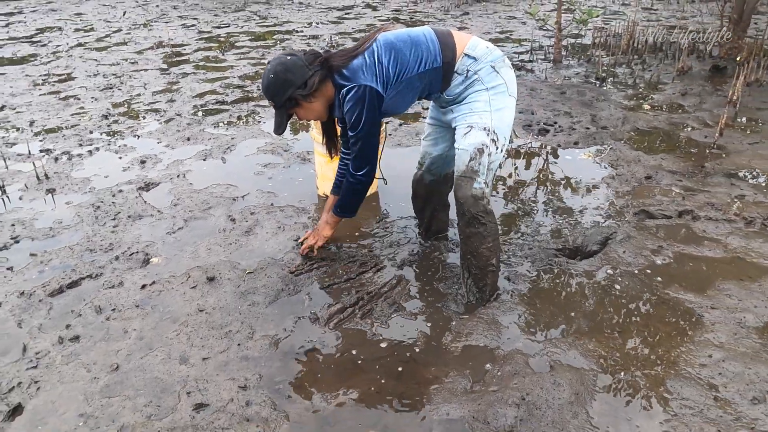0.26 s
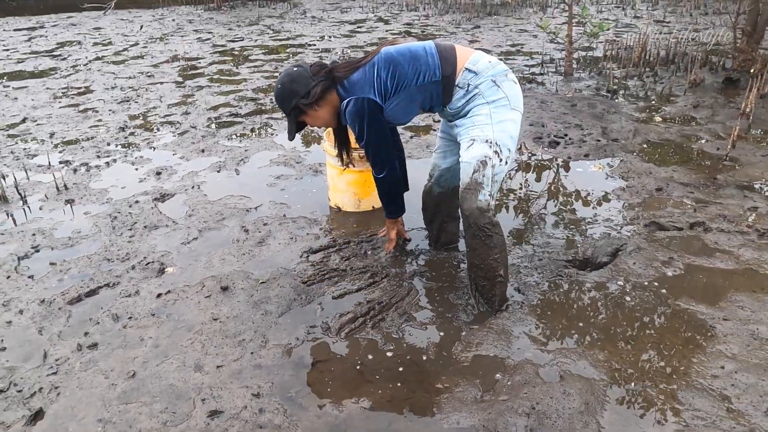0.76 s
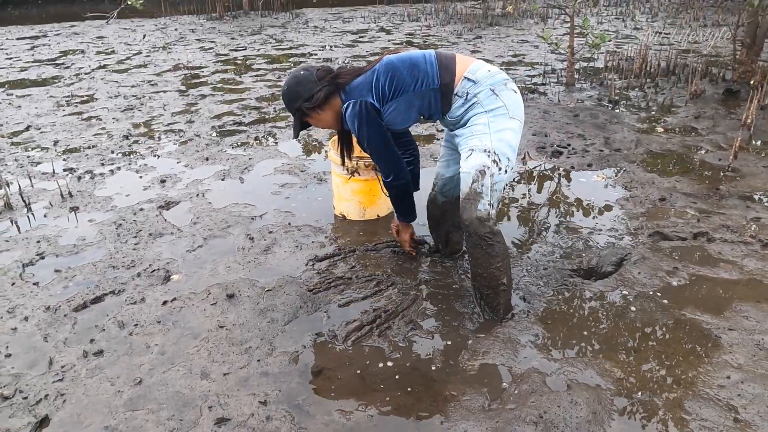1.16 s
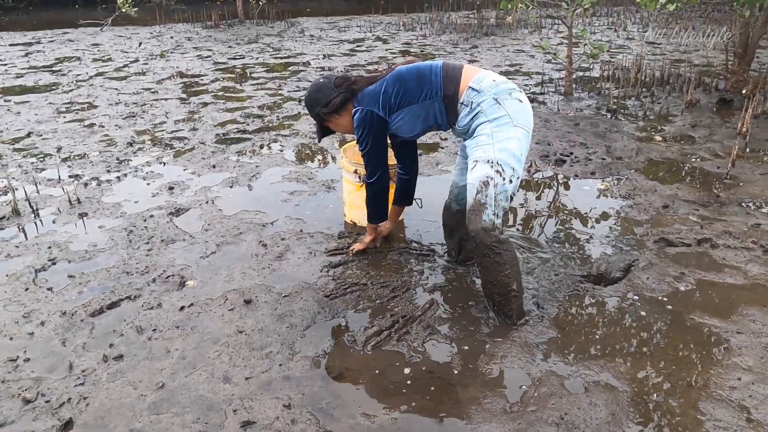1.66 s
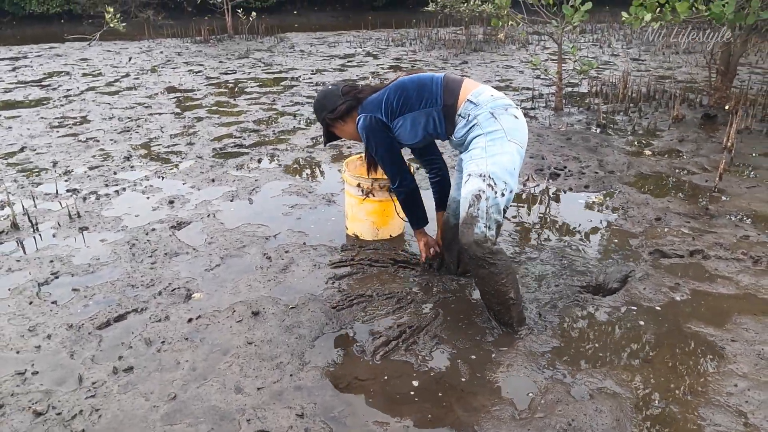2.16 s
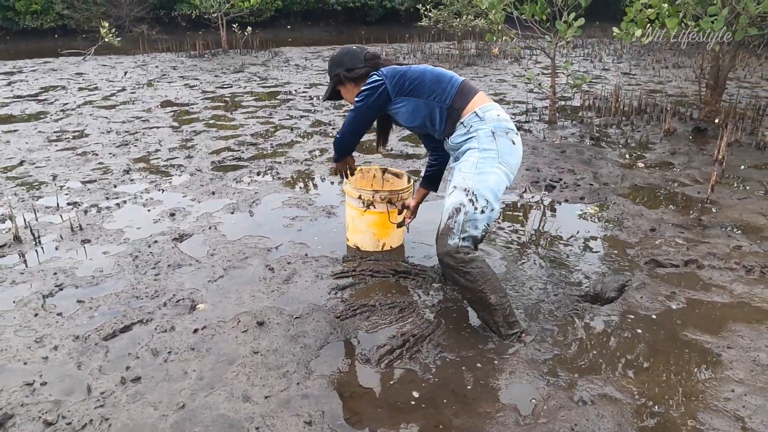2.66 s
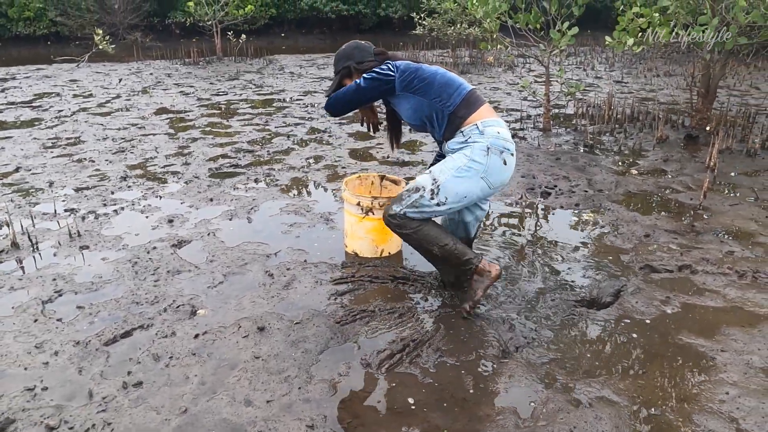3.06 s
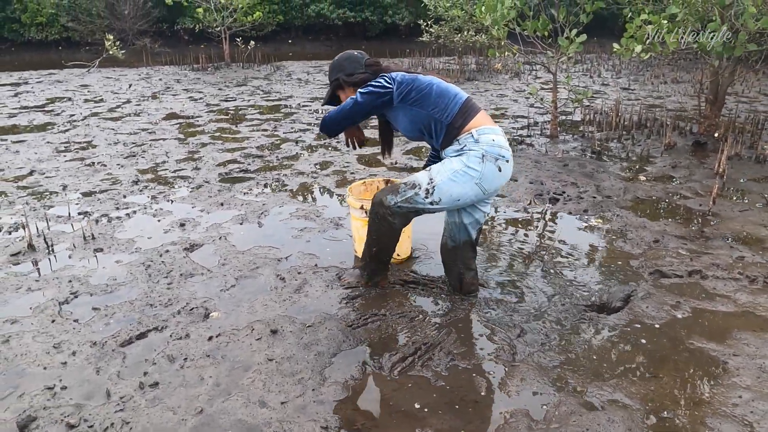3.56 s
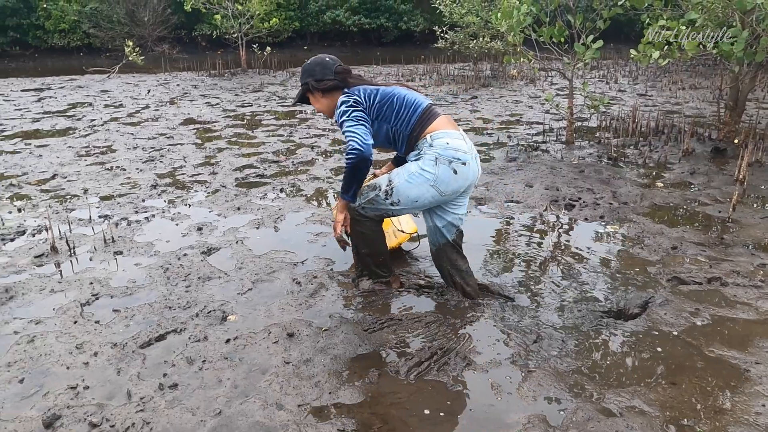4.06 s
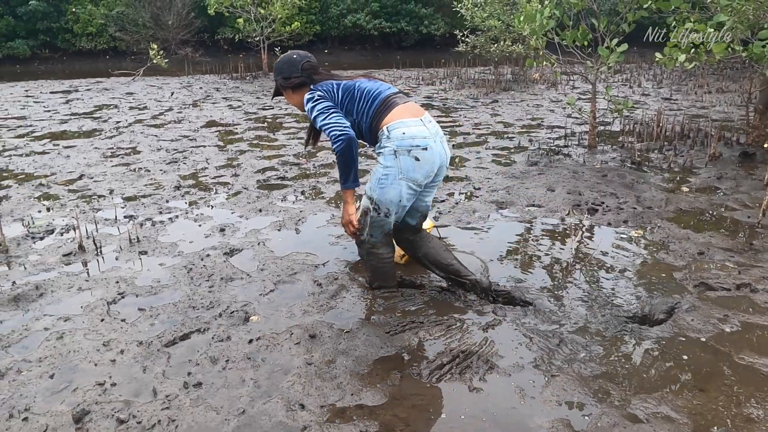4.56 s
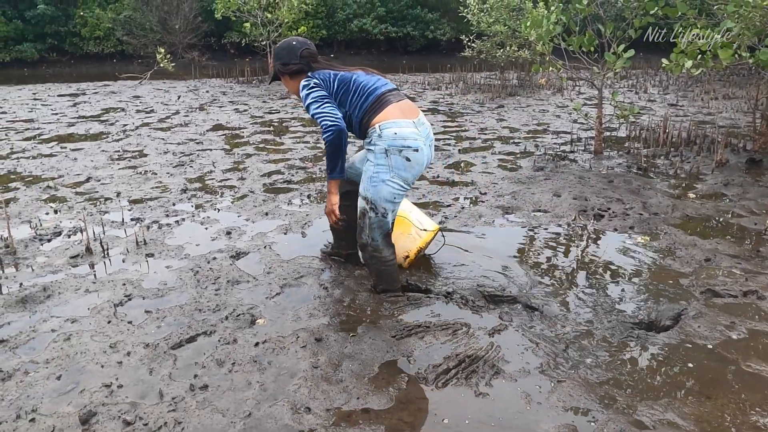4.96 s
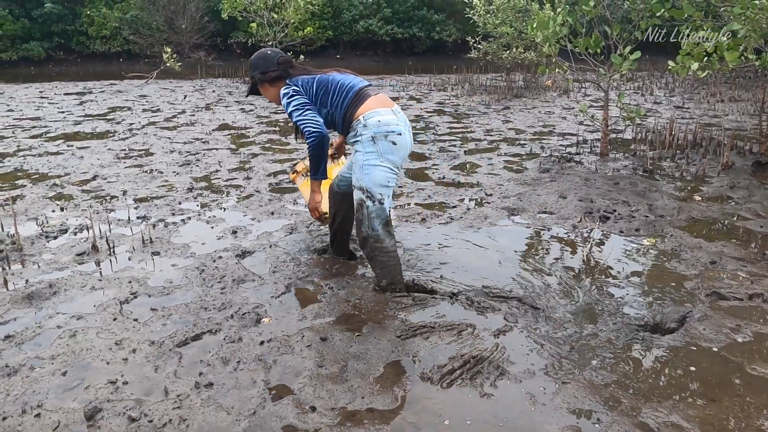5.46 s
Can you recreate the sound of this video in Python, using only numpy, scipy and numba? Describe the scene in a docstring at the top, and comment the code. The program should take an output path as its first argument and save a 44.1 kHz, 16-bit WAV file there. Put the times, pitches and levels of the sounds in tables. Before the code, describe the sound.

Close by, hands rummage in wet mud and shallow water, making small plops, drips and fizzing splashes. About halfway through, feet start wading with fuller squelches and gurgles. A plastic bucket is dragged briefly over the mud with a hollow rub and boom, and more splashing steps follow. A distant low drone lies under everything on the open tidal flat, with light wind rumbling on the microphone.

```python
"""Wading on a tidal flat

Hands rummage in wet mud and legs wade through a thin sheet of water. Air pockets plop, drops and
mud films snap, stirred water fizzes, and air squirts from under a foot. A plastic bucket is dragged
once over the mud, rubbing and booming. Below lie a far drone and light wind on two microphone ports."""
import sys
import numpy as np
from scipy import signal
from scipy.fft import rfft, irfft, next_fast_len
from scipy.io import wavfile
from numba import njit

SR = 44100
rng = np.random.default_rng(int(sys.argv[2]) if len(sys.argv) > 2 else 0)


def file_out(sig):
    """Save sig as 16-bit WAV at sys.argv[1]."""
    # one column per channel
    cols = np.atleast_2d(sig).T
    # limit, then scale
    lim = np.clip(cols, -1, 1)
    pcm = np.round(lim * 32767).astype(np.int16)
    wavfile.write(sys.argv[1], SR, pcm)


N = 251966

# air pockets bursting: t/s, level/dB, f/Hz, fade/ms
AIR_POCKETS = [(0.043, -31.5, 1330, 0.066), (0.0495, -42.5, 544, 11.3), (0.11, -51, 2010, 2.8),
               (0.27, -47.5, 1660, 6.4), (0.319, -42, 1710, 3), (0.391, -41, 294, 17.5),
               (0.4358, -38.5, 1023, 9.1), (0.4385, -37.5, 1700, 0.52), (1.002, -54, 480, 5.8),
               (0.58, -51, 1600, 3.5), (0.637, -49.5, 1920, 5.4), (0.6886, -38, 3330, 1.4),
               (0.7, -42, 2350, 2.7), (0.7478, -36.5, 1233, 7.5), (0.77, -27, 1770, 6.3),
               (0.8288, -45, 1425, 8), (0.839, -43, 3800, 3.8), (0.8649, -42.5, 1580, 2.1),
               (0.886, -45.5, 1790, 8.7), (0.894, -39, 2420, 1), (0.9854, -37, 1700, 0.44),
               (0.9901, -42, 990, 3.2), (1.069, -39, 3960, 3), (1.081, -37, 2420, 0.66),
               (1.0996, -41.5, 2040, 0.57), (0.841, -48, 1340, 4), (0.91, -49, 1350, 2.6),
               (0.928, -48, 1910, 4), (1.03, -50, 990, 4.5), (1.076, -46, 1110, 4), (1.281, -41, 3170, 0.5),
               (1.2898, -38.5, 2670, 0.92), (1.2977, -41, 2460, 7.6), (1.299, -40, 1720, 6),
               (1.3338, -37, 2040, 0.33), (1.431, -39.5, 1500, 0.86), (1.445, -35.5, 2810, 1.7),
               (1.7165, -48, 1660, 3), (1.725, -37.5, 1880, 0.16), (1.727, -47.5, 1060, 4.3),
               (1.995, -44.5, 1860, 2), (2.031, -46.5, 2550, 0.33), (2.076, -53.5, 2290, 0.8),
               (2.205, -57, 3500, 6.1), (2.373, -48, 1150, 0.31), (2.18, -38.5, 3810, 4.2),
               (2.3763, -33, 2710, 2.6), (2.3773, -49.5, 593, 9), (2.563, -46.5, 1530, 11.6),
               (2.6471, -45, 1730, 2.5), (2.7795, -46.5, 976, 7.6), (2.797, -37.5, 2030, 0.3),
               (2.816, -46, 1600, 2.9), (2.8992, -46.5, 1940, 9), (3.008, -35.5, 1690, 0.81),
               (3.0809, -25.5, 770, 4.5), (3.107, -36, 940, 3.3), (3.117, -37, 714, 3.7),
               (3.126, -35, 1100, 0.83), (3.1489, -35, 2200, 0.6), (3.1694, -51, 649, 45),
               (3.172, -38, 2520, 4.7), (3.151, -42, 1280, 2.7), (3.268, -45, 2360, 3.4),
               (3.327, -44, 1820, 2.2), (3.2357, -31.5, 3030, 0.43), (3.61, -43, 1010, 0.5),
               (3.513, -39.5, 1530, 0.36), (3.538, -39, 1780, 2.9), (3.548, -37, 1920, 1.1),
               (3.556, -31, 2010, 1.6), (3.5658, -30.5, 1850, 2.8), (3.582, -23, 2080, 0.15),
               (3.626, -43, 1070, 5.8), (3.6595, -40.5, 1126, 4.9), (3.689, -41.5, 1650, 2.8),
               (3.718, -46.5, 1870, 11), (3.962, -52, 1200, 5), (4.007, -36.5, 840, 1.4),
               (4.0065, -33.5, 2010, 1.5), (4.021, -37.5, 2070, 0.3), (4.322, -42.5, 387, 5.7),
               (4.3234, -37, 960, 0.74), (4.483, -44, 2800, 0.68), (4.7177, -44, 892, 14),
               (4.769, -29, 3300, 1.3), (4.7735, -36, 2920, 4.3), (4.776, -30, 906, 13),
               (4.784, -46, 477, 2.8), (4.7964, -23, 2050, 1.1), (4.8022, -32, 687, 8.5),
               (4.8203, -42, 3400, 2.2), (4.842, -40, 2710, 7.3), (4.851, -39.5, 940, 8.9),
               (4.872, -33, 910, 5.8), (4.9193, -48, 805, 4.9), (5.003, -46.5, 1110, 7.5),
               (5.1216, -34.5, 3310, 1.7), (5.163, -35, 1800, 0.51), (5.172, -32.5, 2520, 1.2),
               (5.18, -34.5, 2520, 0.73), (5.215, -32, 2930, 0.6), (5.25, -39.5, 1765, 6.2),
               (5.281, -50, 1020, 13), (5.374, -37, 1770, 4.4), (5.29, -45, 1930, 13),
               (5.3857, -44, 710, 4.6), (5.401, -47.5, 560, 6.4), (5.404, -39.5, 1820, 2.1),
               (5.476, -49.5, 1040, 15), (5.501, -42, 1560, 2.9), (5.174, -52, 670, 4.1),
               (5.308, -49, 1025, 8), (5.409, -45, 1110, 3.7), (5.17, -37.5, 1690, 4.3)]
SWELL_CYCLES, PLOP_CLIMB = 2.26, 0.015   # attack; share the pitch climbs over swell plus fade
# bubbles surfacing with an upward chirp: t/s, level/dB, f/Hz, fade/ms, climb/(share per s)
SURFACING_BUBBLES = [(1.172, -33, 1155, 5.6, 11), (2.129, -52, 1050, 9, 5.6), (3.042, -40, 1065, 5.6, 35),
                     (3.085, -41, 2050, 8.6, 36), (3.1989, -44.5, 728, 17, 9.1),
                     (4.0012, -31.5, 1205, 3.5, 114), (4.7136, -30.5, 1730, 4, 40),
                     (4.934, -44, 1620, 4.4, 130), (5.541, -49.5, 906, 10, 14)]
# drops and mud films snapping: t/s, level/dB, f/Hz
FILM_SNAPS = [(0.0377, -38.5, 7000), (0.044, -43, 6600), (0.055, -46, 7050), (0.096, -53, 7100),
              (0.14, -38.5, 5000), (0.176, -52, 5300), (0.206, -49.5, 7400), (0.27, -45.5, 3200),
              (0.383, -43, 6550), (0.384, -42, 4000), (0.395, -51, 7800), (0.4477, -42.5, 5230.0),
              (0.473, -45, 4830), (0.491, -41, 6400), (0.508, -44, 4900), (0.6069, -44, 3620),
              (0.751, -48, 8000), (0.7684, -37.5, 3970), (0.803, -37.5, 4020), (0.8517, -40.5, 3660),
              (0.8931, -43, 4070.0), (0.9074, -37, 4800), (0.941, -46.5, 7440), (1.026, -39, 5240),
              (1.045, -41, 4070), (1.0938, -37.5, 7500), (1.096, -42, 3700), (1.102, -43, 6970),
              (1.102, -40, 4200), (1.274, -46, 5700), (1.29, -38.5, 5740), (1.2987, -32, 5100),
              (1.4166, -55, 9200), (1.4289, -34, 4270), (1.44, -41, 5300), (1.4627, -51, 4220.0),
              (1.512, -44.5, 5400), (1.6104, -51.5, 6300), (1.651, -45, 4320), (1.6822, -46.5, 4330),
              (1.727, -38, 4850), (1.7353, -44, 2900), (1.8622, -51, 9100), (1.9468, -47.5, 5360),
              (1.9743, -52, 5800), (2.0445, -51.5, 7450), (2.2892, -50, 2850), (2.289, -39.5, 7100),
              (2.34, -52.5, 6860), (2.414, -37.5, 7000), (2.474, -55, 8200), (2.8154, -51, 3060),
              (3.003, -46, 3380), (3.0942, -47, 9000), (3.1394, -36, 3740), (3.168, -32, 3800),
              (3.3176, -46, 4420), (3.425, -34, 4770), (3.51, -49, 4220), (3.5556, -41, 4700),
              (3.595, -30, 4600), (3.617, -48.5, 8140), (4.008, -44.5, 6500), (4.005, -48, 2790),
              (4.55, -58, 9300), (4.712, -38, 4740), (4.757, -36, 3290.0), (4.761, -38, 7000),
              (4.799, -26.5, 3380), (4.845, -37, 3780), (4.9965, -41, 4570), (5.006, -58, 7560),
              (5.1013, -35, 4400), (5.106, -46, 7100), (5.1146, -37, 4200), (5.122, -33.5, 4500),
              (5.169, -34, 5240), (5.223, -33, 4100), (5.499, -41, 4900), (0.0394, -43, 2740),
              (0.435, -43.5, 3100), (0.731, -48, 4530), (1.224, -54, 2580), (1.5753, -54.5, 5800),
              (1.884, -52, 7300), (2.054, -52, 2340), (2.103, -54, 2600), (2.259, -59, 4560),
              (3.699, -55, 2870), (3.865, -54, 4500), (4.022, -41.5, 4730), (4.351, -46, 2760),
              (4.3993, -51, 4880), (4.462, -51, 4000), (4.59, -56.5, 4050), (4.6572, -51, 2700),
              (4.928, -45.5, 2860), (4.954, -53.5, 7150), (5.0537, -45.5, 2770), (5.088, -47, 4220),
              (5.3893, -48, 3640), (5.571, -53, 6250), (0.826, -39, 5800), (0.861, -43, 5200),
              (0.931, -53, 7500), (0.954, -51, 8300), (0.985, -47, 5030), (0.556, -51, 2960),
              (1.89, -55, 2740), (1.905, -58, 7050), (2.229, -57, 4550), (5.289, -53, 7700),
              (2.377, -51, 7500), (1.39, -52, 8000)]

# strokes of hand or leg: t/s, hold/s, bubbling level/dB, then over it slurp/dB, gurgle/dB, fizz/dB
WATER_STROKES = [(0.0, 0.072, -67.5, 6, -6, 1), (0.154, 0.24, -73, 4, -18, 3.5),
                 (0.383, 0.051, -63, 4.5, -17, 2.5), (0.466, 0.22, -72, -16, -2.5, 5.5),
                 (0.748, 0.17, -61, -21, -29, 1), (0.897, 0.26, -62.5, -5.5, -16, -2.5),
                 (1.253, 0.11, -61, -13, -23, 0), (1.435, 0.027, -68.5, -16, -26, -1),
                 (1.654, 0.058, -66.5, -15, -16, -1.5), (1.962, 0.063, -78.5, -4, 0, 2),
                 (2.281, 0.061, -72.5, -18, -19, 0.5), (2.604, 0.065, -74.5, 6.5, -7, -13),
                 (2.702, 0.098, -60.5, -6, -23, -11), (2.886, 0.025, -58, -3, -3.5, -3.5),
                 (2.99, 0.17, -63, -21, -3, -1.5), (3.087, 0.16, -58.5, -8, -0.5, -3),
                 (3.28, 0.17, -66.5, -33, -3.5, -1), (3.523, 0.093, -56.5, -9.5, -8, -5),
                 (3.653, 0.1, -64, -2, -14, -9), (4.06, 0.26, -62, 2.5, 2.5, -6),
                 (4.352, 0.14, -74, -2.5, -6, 3.5), (4.712, 0.036, -52.5, -32, -19, -7.5),
                 (4.765, 0.041, -48.5, -25, -1.5, 0), (4.85, 0.079, -61, -27, -7, -1.5),
                 (4.973, 0.032, -61.5, -30, -27, 5), (5.079, 0.071, -64.5, -29, -19, 9.5),
                 (5.158, 0.056, -58, -34, -30, 0), (5.234, 0.12, -56.5, -38, -21, -4),
                 (5.386, 0.12, -60.5, -17, -11, -1), (5.557, 0.12, -77.5, 4.5, -8, 7)]
ATTACK_DB_PER_S, RELEASE_DB_PER_S = 897, 197
SPRAY_DB, SPRAY_FOLLOWS = -6.5, 1.66   # spray over the bubbling; dB it gains per dB of fizz offset
# water between strokes: level/dB of slurp, gurgle, bubbling, fizz and spray
CALM_WATER_DB = [-104, -109, -79.5, -84, -79.5]

# resonances of the air squirt: f/Hz, width/Hz, level/dB
SQUIRT_RESONANCES = [(1780, 670, 2.5), (3400, 1100, 2.5), (5350, 770, 1.5), (7200, 380, -1)]
SQUIRT_START_S, SQUIRT_DB, SQUIRT_FADE_S = 2.8562, -57.5, 0.021

# friction of the bucket on the mud: t/s, level/dB
DRAG_FRICTION = [(4.02, -63.5), (4.06, -63), (4.174, -55.5), (4.34, -65.5), (4.42, -78)]
# resonances of its hollow body: f/Hz, width/Hz, level/dB
BUCKET_MODES = [(235.7, 41, 13), (311, 32, 2), (685, 280, -1), (980, 230, 4.5), (1510, 290, -3),
                (2900, 1700, -7.5), (6500, 1600, -25)]
# its booms as it lurches: t/s, level/dB, f/Hz, swell and fade/ms
BUCKET_LURCHES = [(4.0931, -31, 236, 12), (4.1357, -32.5, 230, 9.3), (4.1862, -21.5, 239, 11.3),
                  (4.2661, -41, 270, 11), (4.306, -36, 265, 5.4), (4.337, -31.5, 218, 7.8)]

# gusts on the ports: t/s, level/dB
GUSTS = [(0, -55.5), (0.35, -40.5), (0.6, -60), (1.4, -45), (2.1, -50), (2.6, -48), (2.9, -38.5),
         (3.22, -39.5), (3.31, -26), (3.42, -33), (3.5, -36), (3.62, -31), (3.8, -49), (4.05, -49.5),
         (4.45, -54.5), (5.05, -37), (5.3, -46), (5.71, -48.5)]
# noise bands of the far drone: f/Hz, width/Hz, level/dB
DRONE_BANDS = [(62.5, 8.7, -4.5), (75.4, 15.7, -2.5), (103.5, 14.4, -6), (129.3, 17.3, -10.5),
               (155.1, 16.2, -15.5), (206.5, 25, -22)]
# steadier tones in the drone: f/Hz, wander/Hz, level/dB
HUM_TONES = [(62.33, 1.524, 2), (150, 1.52, -8.5), (235.4, 2.52, -23)]
# far noise of the flat: f/Hz, level/dB
AIR_SPECTRUM = [(59, -36), (100, 1.5), (172, -16.5), (225, -7.5), (277, -16.5), (371, -27.5), (612, -36.5),
                (1660, -35), (2570, -45), (3700, -49), (5800, -45), (8300, -57), (9100, -60), (12000, -68),
                (14500, -84)]
# how alike that noise is left and right: f/Hz, likeness/(0 to 1)
AIR_COHERENCE = [(30, 1), (300, 0.8), (2000, 0.074), (6000, 0.57), (12000, 0.17)]
DRONE_DB, AIR_DB = -41.5, -55.5

# colour of the ports: f/Hz, left minus right level/dB
PORT_TILT = [(60, -1.5), (130, 2.5), (290, -2.7), (630, -0.5), (1370, 1.5), (2990, 2), (6540, 2.5),
             (14300, 0)]
# phase between the ports: f/Hz, lead of the left/rad
PORT_LEAD = [(30, 0.12), (600, -0.4), (1200, -0.037), (2410, -0.64), (4820, -0.58), (5940, -1.38),
             (6720, -0.4), (12100, -0.56), (14500, -1.1)]
CUTOFF_HZ = 14850


def plops():
    """Air pockets ring with a slight climb and a rough tail; surfacing bubbles chirp. Both spatter."""
    s, level_db, hz, fade_ms = np.transpose(AIR_POCKETS)
    swell, fade = SWELL_CYCLES / hz, fade_ms / 1000
    pockets = rings(s, from_db(level_db), hz, swell, fade, PLOP_CLIMB / (swell + fade))
    s, level_db, hz, fade_ms, climb = np.transpose(SURFACING_BUBBLES)
    chirps = rings(s, from_db(level_db), hz, SWELL_CYCLES / hz, fade_ms / 1000, climb)
    tails = spatter(AIR_POCKETS, width_share=0.24, gain_db=-19, fade_s=0.012)
    droplets = spatter(AIR_POCKETS + SURFACING_BUBBLES, width_share=0.78, gain_db=-9.5, fade_s=0.0035)
    return pockets + chirps + tails + droplets


def snaps():
    """Drops and mud films snap: a ring of a few cycles, a bright tick and a short hiss."""
    s, level_db, hz = np.transpose(FILM_SNAPS)
    body = rings(s, from_db(level_db + 2.5), hz, swell_s=1.02 / hz, fade_s=3.2 / hz)
    tick_db = level_db - 26 + rng.normal(0, 7.0, len(s))
    ticks = rings(s, from_db(tick_db), hz=12000, swell_s=0.00008, fade_s=0.00019)
    wide_hiss = spatter(FILM_SNAPS, width_share=0.57, gain_db=-6.5, fade_s=0.0032)
    tight_hiss = spatter(FILM_SNAPS, width_share=0.24, gain_db=-7, fade_s=0.0016)
    return body + ticks + wide_hiss + tight_hiss


def spatter(events, width_share, gain_db, fade_s):
    """Thrown droplets land: a puff of noise around each event's pitch."""
    out, longest = np.zeros(N), 2600
    t = np.arange(min(int(7 * fade_s * SR), longest)) / SR
    envelope = np.exp(-t / fade_s) * (1 - np.exp(-t / 0.001))
    for (s, level_db, hz, *_), noise in zip(events, rng.standard_normal((len(events), longest))):
        hiss = rms_one(resonate(noise[:len(t)], hz, width_share * hz))
        add(out, s - .0007, from_db(level_db + gain_db) * hiss * envelope)
    return out


def stirred_water():
    """Strokes stir five bubble layers, from mud slurp to fine spray, roughened by crackle and wash."""
    tear, wash = crackle(per_s=220, spread_db=2.5), rng.standard_normal(N)
    slurp = bubbles(300, 360, 680, cycles=1.1, spread_db=4.5, clump_db=2.0, climb_per_s=5.4)
    gurgle = bubbles(250, 661, 1028, cycles=3.1, spread_db=5.5, clump_db=4.0, climb_per_s=5.1)
    bubbling = bubbles(1100, 1152, 2660, cycles=2.6, spread_db=6.0, clump_db=4.5, climb_per_s=13.0)
    fizz = bubbles(900, 2385, 5920, cycles=3.6, spread_db=3.0, clump_db=4.0, climb_per_s=40.0)
    spray = bubbles(1500, 4600, 8400, cycles=3.6, spread_db=4.5, clump_db=5.0, climb_per_s=3.7)
    gurgle += 0.33 * rms_one(band(band(tear, 650, 980), 650, 980))
    bubbling += 0.69 * rms_one(band(band(tear, 1050, 2380), 1050, 2380))
    bubbling += 0.38 * rms_one(band(wash, 1380, 2880))
    fizz += 0.31 * rms_one(band(tear, 3300, 4600))
    fizz += 0.22 * rms_one(band(wash, 2500, 5200))
    spray += 0.35 * rms_one(band(band(tear, 6500, 11600), 6500, 13500))
    spray += 0.18 * rms_one(band(wash, 7800, 9000))
    spray += 0.07 * bubbles(100, 10000, 13500, cycles=1.5, spread_db=16.5, clump_db=7.0, climb_per_s=0.)
    layers = np.array([slurp, gurgle, bubbling, fizz, spray])
    return np.sum(stroke_envelopes() * layers, axis=0)


def stroke_envelopes():
    """One gain per water layer: each stroke swells, holds and ebbs; powers add over the calm water."""
    start, hold, db, slurp_db, gurgle_db, fizz_db = np.transpose(WATER_STROKES)
    t = np.arange(0, N + 64, 64)[:, None] / SR
    attack_db = -ATTACK_DB_PER_S * np.maximum(start - t, 0)
    release_db = -RELEASE_DB_PER_S * np.maximum(t - start - hold, 0)
    shape = from_db(attack_db + release_db)
    spray_db = SPRAY_DB + SPRAY_FOLLOWS * fizz_db
    held = from_db([db + slurp_db, db + gurgle_db, db, db + fizz_db, db + spray_db])
    gains = np.sqrt(shape ** 2 @ held.T ** 2 + from_db(CALM_WATER_DB) ** 2)
    return np.array([np.interp(np.arange(N) / SR, t[:, 0], gain) for gain in gains.T])


def bubbles(per_s, low_hz, high_hz, cycles, spread_db, clump_db, climb_per_s):
    """Small bubbles ring in random clumps, uneven in size, pitch and length; rms 1."""
    born = rng.random(N) < per_s * from_db(clump_db * drift(20)) / SR
    pitch, size, length, climb = rng.random((N, 4))[born].T
    hz = low_hz * (high_hz / low_hz) ** pitch
    height = from_db(-spread_db * np.log(np.maximum(size, .03)))
    fade = cycles * (0.071 + 2.83 * length) / hz
    return rms_one(rings(np.flatnonzero(born) / SR, height, hz, 0.13 * fade, fade, climb_per_s * climb))


def crackle(per_s, spread_db):
    """Thin films tear: broadband clicks a few milliseconds long over a steady wet hiss; rms 1."""
    born = rng.random(N) < per_s * from_db(4.0 * drift(12)) / SR
    sizes = from_db(spread_db * np.minimum(rng.exponential(1, N), 3.0))
    decay = np.exp(-1 / (0.0022 * SR))
    envelope = signal.lfilter([1], [1, -decay], born * sizes + 1e-18)
    return rms_one((rms_one(envelope) + 0.14) * rng.standard_normal(N))


def squirt():
    """Air squirts from under the foot as it pulls free: a sudden rasp in a few bands, dying away."""
    t = np.arange(N) / SR - SQUIRT_START_S
    jet = (t > 0) * np.exp(-np.maximum(t, 0) / SQUIRT_FADE_S) * from_db(SQUIRT_DB)
    return jet * noise_bands(SQUIRT_RESONANCES)


def bucket():
    """Friction with the mud drives the hollow body's resonances; lurches make it boom."""
    friction = from_db(level_curve(DRAG_FRICTION)) * rng.standard_normal(N)
    rub = sum(from_db(db) * resonate(friction, hz, width) * np.sqrt(SR / width)
              for hz, width, db in BUCKET_MODES)
    s, level_db, hz, ms = np.transpose(BUCKET_LURCHES)
    booms = rings(s, from_db(level_db), hz, swell_s=ms / 1000, fade_s=ms / 1000)
    return rub + booms


def wind():
    """Gusts press on the ports: a lumpy rumble with a thud above it, mostly shared, leaning right."""
    pressure = band(rng.standard_normal((3, N)), 20, 214)
    shared, left, right = (rms_one(band(p, 26.4, 63.7) + 0.17 * band(p, 101, 122.3)) for p in pressure)
    gust = from_db(level_curve(GUSTS) + 1.1 * drift(10))
    return gust * np.array([shared + 0.5 * left, shared + 0.31 * right]) * from_db([[-3.1], [2.4]])


def drone():
    """A far hum: narrow low noise bands with slightly wandering tones running through them."""
    hum = noise_bands(DRONE_BANDS)
    for hz, wander_hz, db in HUM_TONES:
        gain = from_db(db + 1.3 * drift(3.9))
        pitch_hz = hz + wander_hz * drift(2.94)
        hum += gain * np.sin(2 * np.pi * np.cumsum(pitch_hz) / SR)
    return from_db(DRONE_DB) * rms_one(hum)


def air():
    """A bed of far noise from the open flat, centred in the bass and wider above."""
    hz = np.fft.rfftfreq(N, 1 / SR)
    alike = np.clip(at_hz(AIR_COHERENCE, hz), 0, 1)
    mid, side = rfft(rng.standard_normal((2, N))) * from_db(at_hz(AIR_SPECTRUM, hz))
    stereo = irfft(np.sqrt(1 + alike) * mid + np.sqrt(1 - alike) * side * [[1], [-1]], N)
    return from_db(AIR_DB) * rms_one(stereo)


def scatter(x):
    """Drops fall all over the wet patch: a side signal that throws the treble left and right."""
    treble = from_db(-13.5) * band(x, 3070, 8500)
    sparkle = from_db(-7.0) * band(band(x, 9000, 15000), 9000, 15000)
    return (treble + sparkle) * drift(150) * [[1], [-1]]


def ports(x):
    """The two microphone ports colour and phase-shift one source differently."""
    size = next_fast_len(N + 2048)
    hz = np.fft.rfftfreq(size, 1 / SR)
    left = from_db(at_hz(PORT_TILT, hz) / 2) * np.exp(.5j * at_hz(PORT_LEAD, hz))
    return irfft(rfft(x, size) * np.array([left, 1 / left]), size)[:, :N]


def rings(s, height, hz, swell_s, fade_s, climb_per_s=0.):
    """Sine pings with random phases, peaking at the times s."""
    out, phase = np.zeros(N), rng.uniform(0, 2 * np.pi, len(s))
    rows = np.column_stack(np.broadcast_arrays(s, height, hz, swell_s, fade_s, climb_per_s, phase))
    add_rings(out, rows, float(SR))
    return out


@njit
def add_rings(out, rows, sr):
    """Each gliding sine swells as a bell curve, then loses 10 dB per fade time."""
    for k in range(len(rows)):
        at, height, hz, swell, fade, climb, phase = rows[k]
        for i in range(max(int((at - 2 * swell) * sr), 0), min(int((at + 5 * fade) * sr), len(out))):
            t = i / sr - at
            shape = np.exp(-1.15 * (t / swell) ** 2) if t < 0 else np.exp(-1.15 * t / fade)
            out[i] += height * shape * np.sin(phase + 2 * np.pi * hz * (t + climb * t * t / 2))


def noise_bands(bands):
    """One white noise through parallel resonances."""
    white = rng.standard_normal(N)
    return sum(from_db(db) * rms_one(resonate(white, hz, width)) for hz, width, db in bands)


def resonate(x, hz, width_hz):
    """Two like resonators in series, unity gain at the peak."""
    r = np.exp(-np.pi * width_hz / SR)
    b = np.array([1, 0, -1]) * (1 - r * r) / 2
    a = [1, -2 * r * np.cos(2 * np.pi * hz / SR), r * r]
    return signal.lfilter(b, a, signal.lfilter(b, a, x))


def band(x, low_hz, high_hz):
    return signal.sosfilt(signal.butter(2, [low_hz, high_hz], "band", fs=SR, output="sos"), x)


def drift(rate_hz):
    """A smooth random modulator, rms about 1."""
    step = 40
    r = np.exp(-2 * np.pi * rate_hz * step / SR)
    slow = signal.lfilter([1], [1, -2 * r, r * r], rng.standard_normal(N // step + 2002))[2000:]
    return np.interp(np.arange(N) / step, np.arange(len(slow)), rms_one(slow))


def level_curve(points):
    """A fader ride in dB, silent outside its points."""
    s, db = np.transpose(points)
    return np.interp(np.arange(N) / SR, s, db, left=-120, right=-120)


def at_hz(points, hz):
    """A curve read along a log frequency axis."""
    point_hz, values = np.transpose(points)
    return np.interp(np.log(hz + 1), np.log(point_hz + 1), values)


def add(out, s, sound):
    i = max(round(s * SR), 0)
    out[i:i + len(sound)] += sound[:N - i]


def from_db(db):
    return 10 ** (np.asarray(db) / 20)


def rms_one(x):
    return x / np.sqrt(np.mean(x ** 2) + 1e-20)


def scene():
    """Mud, water and bucket up close, over a bed of drone, wind and air."""
    near = plops() + snaps() + stirred_water() + squirt() + bucket()
    return ports(near + drone()) + scatter(near) + wind() + air()


def record(dry):
    """A steep high cut takes off the very top."""
    return signal.sosfilt(signal.cheby2(12, 70, CUTOFF_HZ, fs=SR, output="sos"), dry)


dry = scene()
out = record(dry)
file_out(out)
```